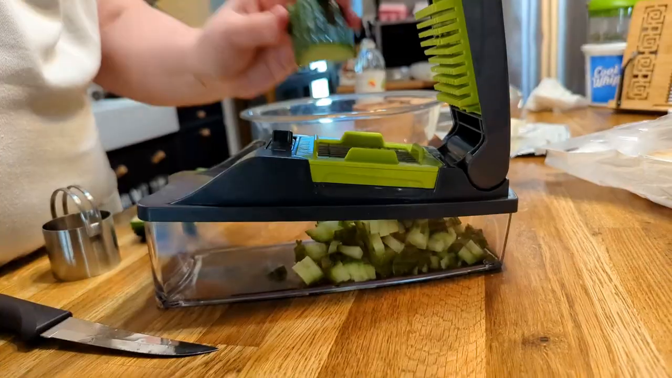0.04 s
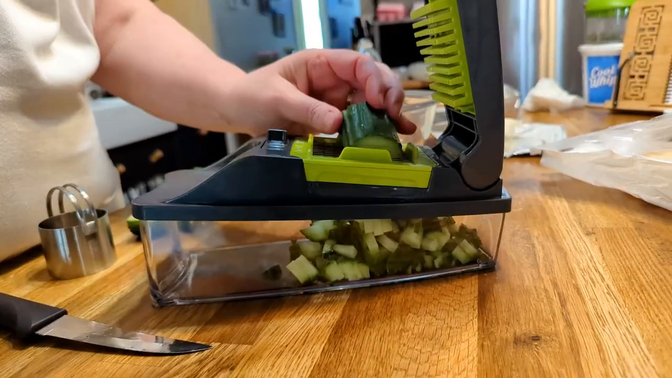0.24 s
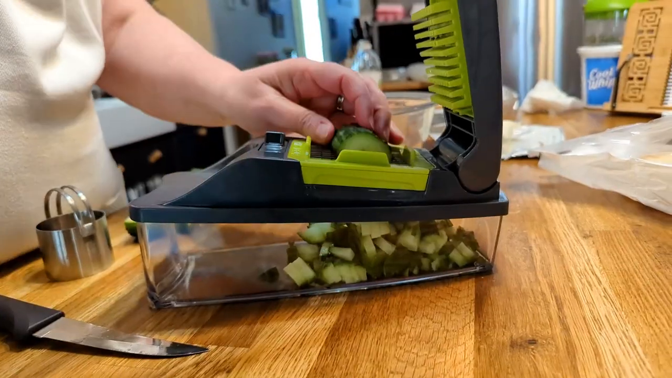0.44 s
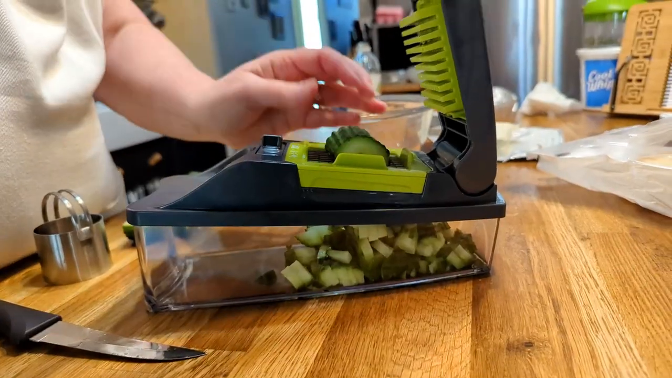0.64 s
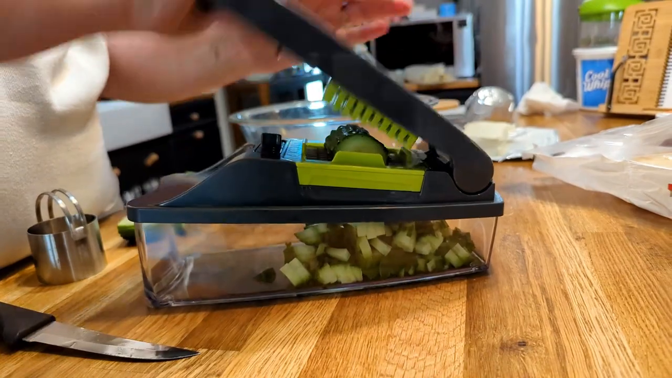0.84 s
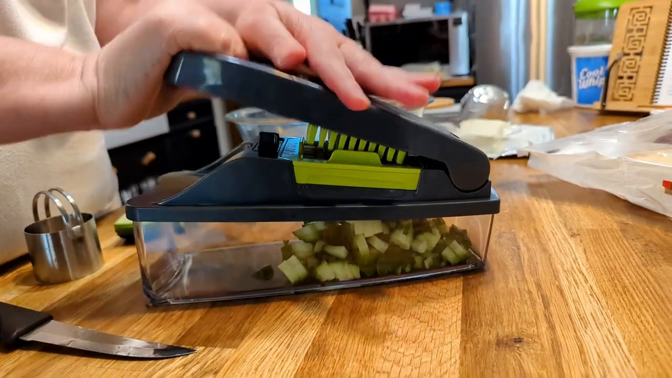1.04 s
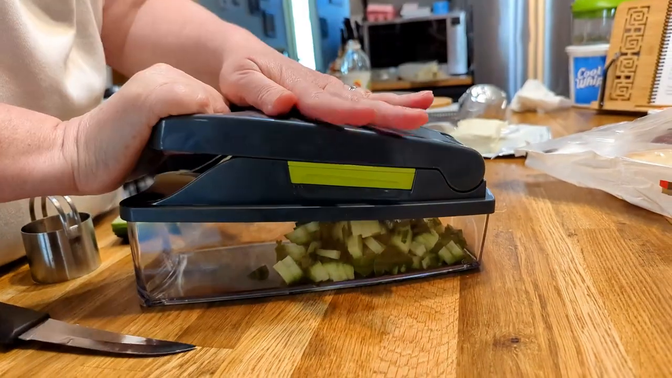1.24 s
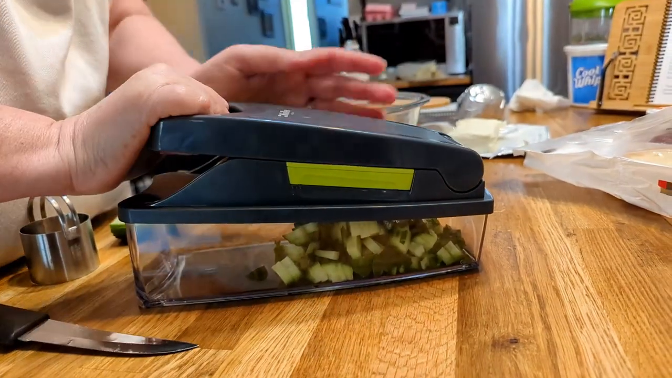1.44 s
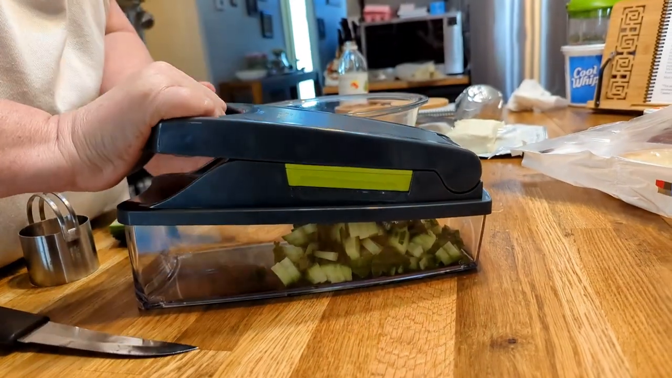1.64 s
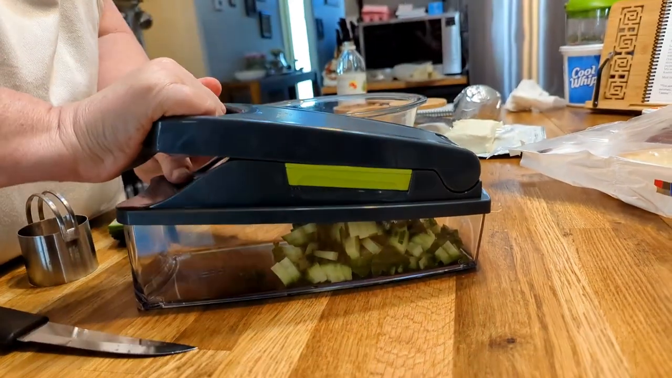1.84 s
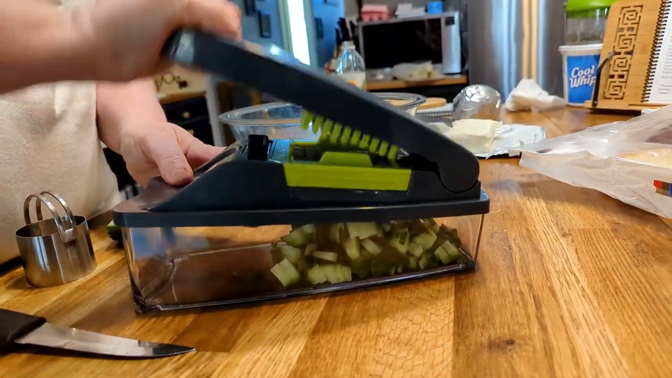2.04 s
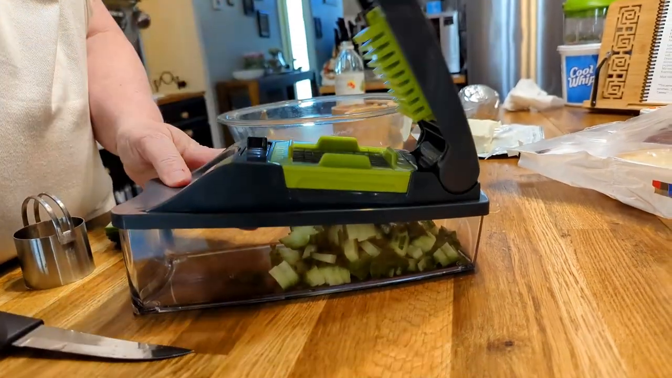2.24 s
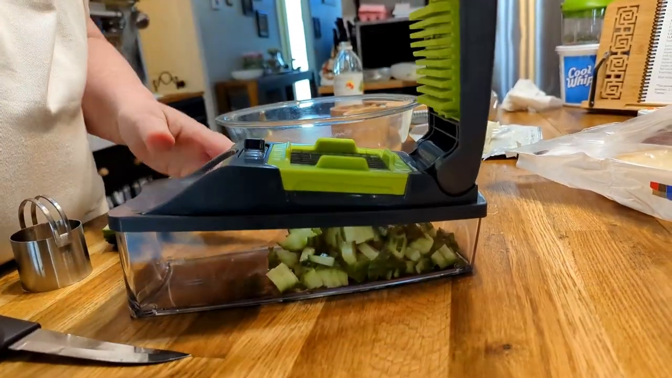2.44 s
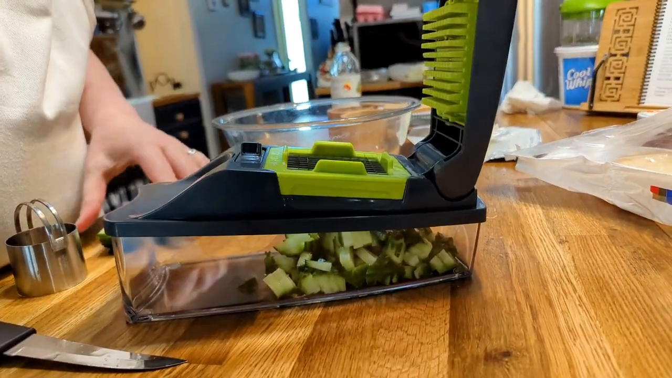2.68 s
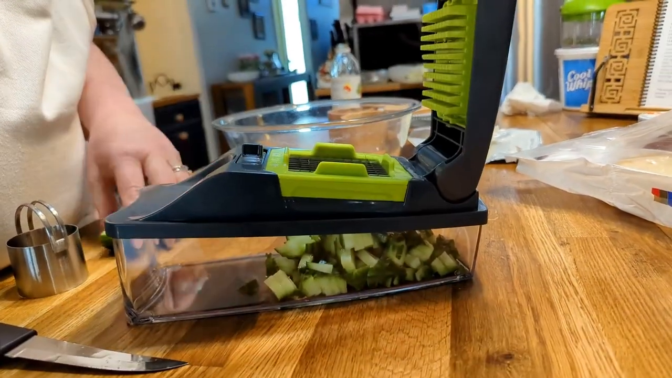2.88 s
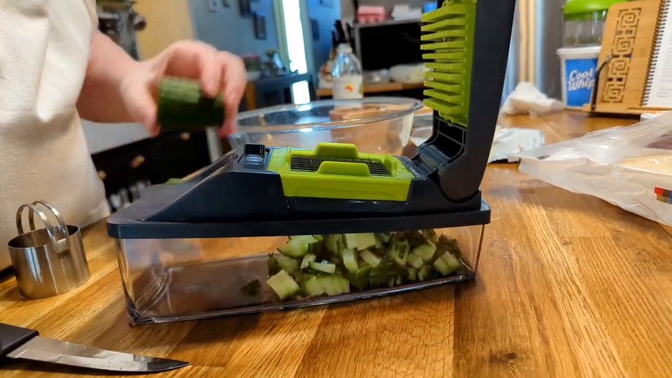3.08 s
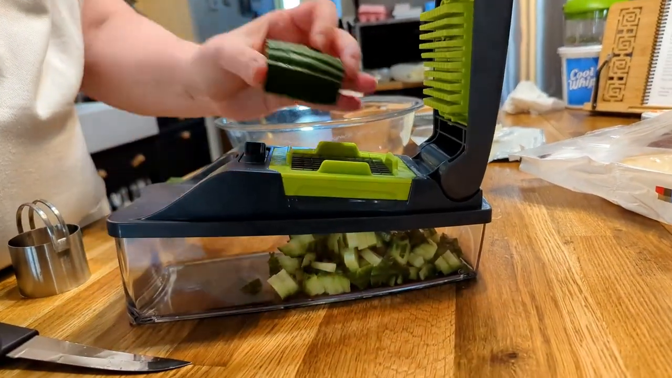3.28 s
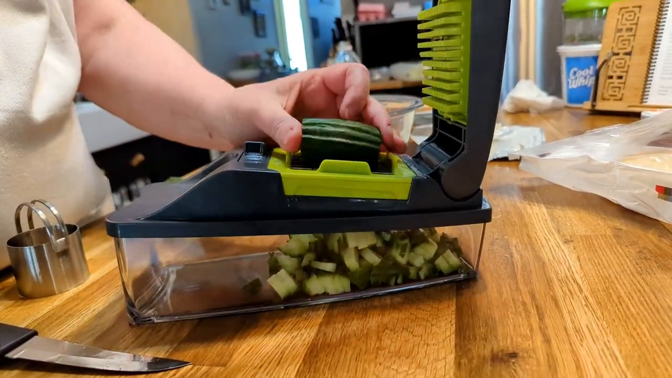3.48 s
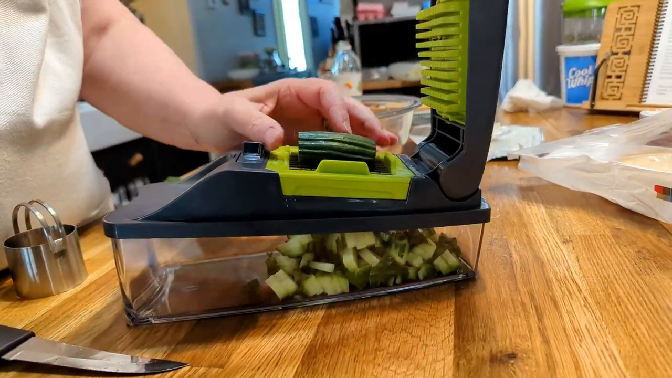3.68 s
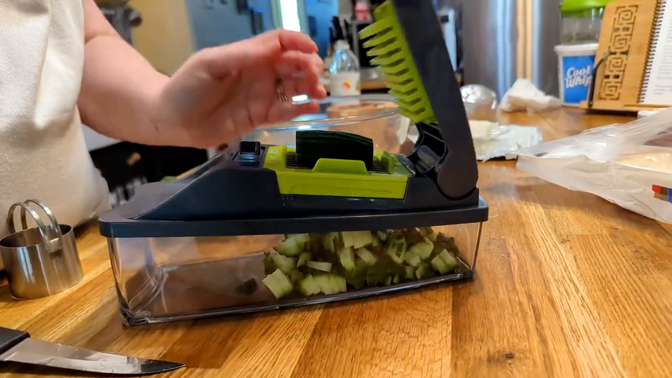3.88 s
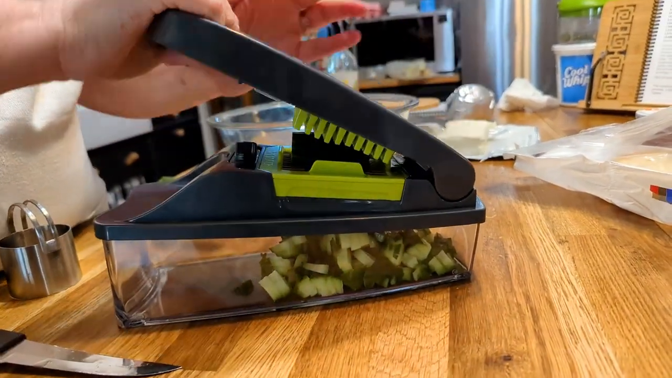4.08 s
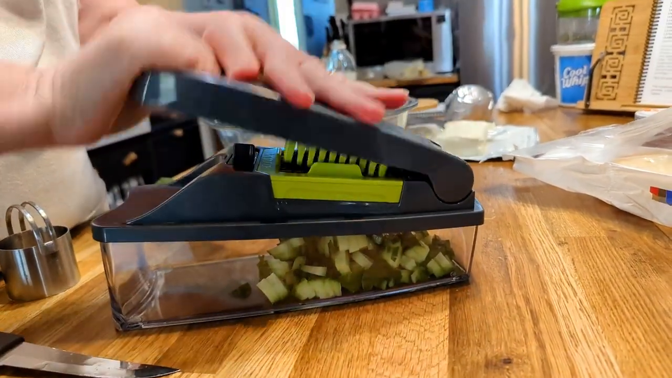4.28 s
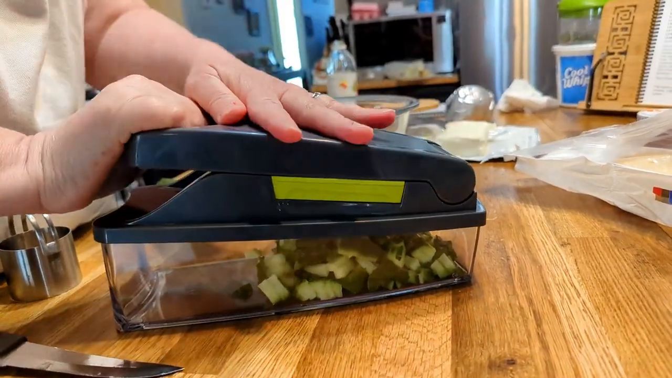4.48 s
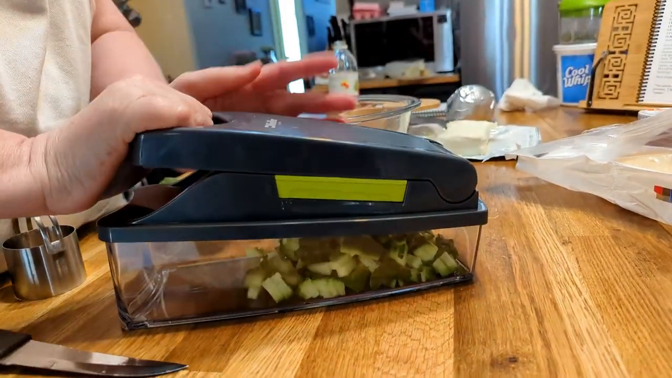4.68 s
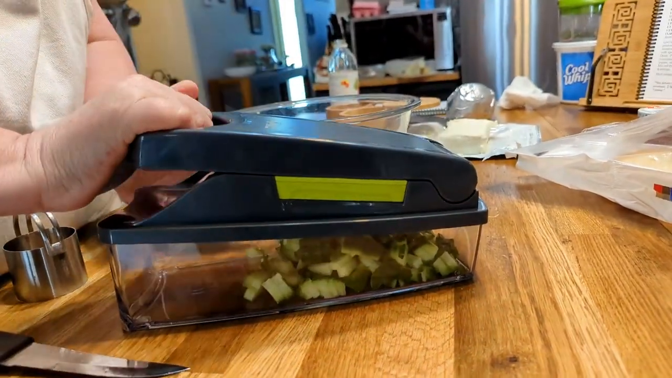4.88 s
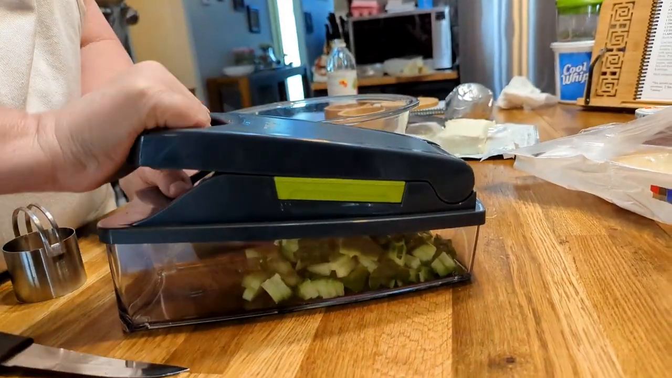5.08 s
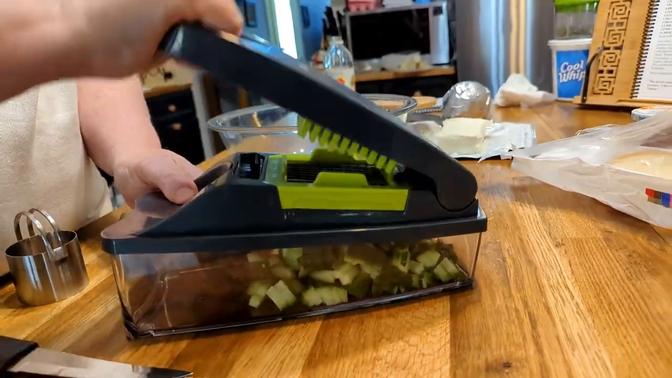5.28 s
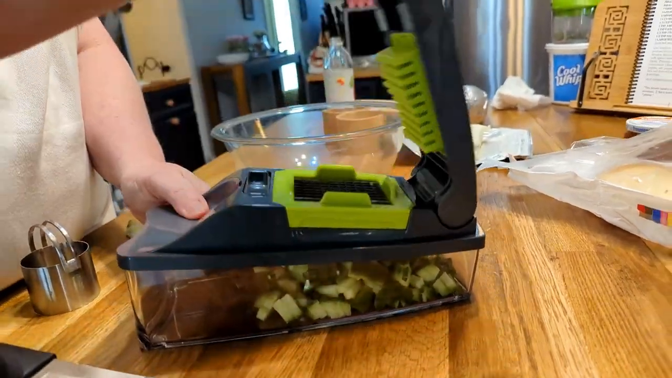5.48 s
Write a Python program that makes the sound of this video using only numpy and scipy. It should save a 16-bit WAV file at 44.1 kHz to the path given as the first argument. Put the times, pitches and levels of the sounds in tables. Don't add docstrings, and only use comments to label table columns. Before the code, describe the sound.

A quiet kitchen with a soft low room wash and faint appliance hum, heard close in stereo with short, bright reflections. At 0.2-0.3 s a vegetable piece is set down with small dull clicks, then faint finger touches. Around 0.93 s the plastic lid knocks sharply; at 1.15 s the piece cracks and fibres crunch in a quick burst, fading by 1.4 s, leaving a very faint low glassy tone. Soft touches lead to a hollow clack and rattle at 2.05 s as the lid pulls free, then hinge ticks and light rubbing to 2.7 s. Near quiet until a piece clicks down at 3.45 s. A glass bowl tings brightly at 3.85 s, damped soon after. Lid taps at 4.1-4.2 s; a creak rises from 4.3 s into the loudest event, a heavy crunching crack and woody thunk at 4.37-4.48 s. Faint handling, then release clatter at 5.25-5.3 s and a small last knock at 5.46 s.

```python
import sys
import numpy as np
from scipy import signal
from scipy.fft import rfft, irfft, next_fast_len
from scipy.io import wavfile
from scipy.ndimage import uniform_filter1d

SR = 44100
rng = np.random.default_rng(int(sys.argv[2]) if len(sys.argv) > 2 else 0)


def voltage_ratio(level):
    return 10 ** (np.asarray(level, float) / 20)


def output_pcm(signal):
    pcm = np.clip(np.atleast_2d(signal).T, -1, 1) * 32767
    wavfile.write(sys.argv[1], SR, np.round(pcm).astype(np.int16))


N = 243431

# (frequency [Hz], level [dB per Hz])
AIR = [(25, -40.5), (45, -5), (70, -4), (125, 0.5), (400, -8), (1100, -19.5), (4500, -34.5), (16000, -43.5)]
AIR_DB = -59.5
# (frequency [Hz], width [Hz], level [dB])
HUM = [(117.8, 12, -65.5), (301.7, 6.9, -71), (440, 8, -75), (725.4, 14, -73)]
# (frequency [Hz], t60 [s])
KITCHEN = [(60, 0.13), (250, 0.51), (1000, 0.51), (3000, 0.62), (7000, 0.56), (14000, 0.2)]
KITCHEN_DB = -11.5
# (frequency [Hz], side gain [dB])
PORT_WIDTH = [(60, -22), (200, -18), (400, -7.5), (800, -3.5), (2000, 1.5), (8000, 0), (16000, 1)]
# (time [s], left minus right [dB])
PLACE = [(0.0, -4.5), (0.11, 0.5), (0.37, -1.5), (1.43, -1), (2.01, -1.5), (3.21, -1), (3.24, -1.5),
         (3.64, -1), (3.709, -1.5), (3.89, 2.5), (4.09, 0), (4.23, 0), (4.58, -1), (5.13, -1), (5.52, -1)]
# (frequency [Hz], gain [dB])
MICROPHONE = [(15, -32.5), (30, -29), (45, -12.5), (70, -4.5), (160, -3), (14500, -1), (15800, -11),
              (16600, -30.5)]
# (time [s], depth [dB], half length [ms])
CLAMPS = [
    (1.151, -12.5, 2.8),
    (4.378, -10, 3.2),
]

# (frequency [Hz], level [dB], t60 [s])
COUNTER = [(52.3, -10.5, 0.15), (68.7, -1, 0.5), (84.5, -12, 0.057), (103, 0.5, 0.078), (160.8, 5, 0.66),
           (185, -10, 0.11)]
# (time [s], level [dB], rise [dB/s], fall [dB/s])
THUDS = [(.938, -41, 654, 70), (1.03, -41.5, 148, 152), (1.19, -41.5, 123, 67), (1.346, -44, 167.5, 163),
         (1.86, -47, 158, 432), (2.073, -30, 594, 116), (2.31, -64, 600, 280), (3.51, -49, 151, 398),
         (3.642, -49, 400, 123), (3.94, -47, 202.5, 108), (4.214, -43.5, 110, 280),
         (4.292, -37.5, 699.5, 113.5), (4.41, -21.5, 649, 124.5), (5.07, -53, 300, 100),
         (5.289, -24, 477, 163.5), (5.5, -53, 149, 100)]

# (frequency [Hz], level [dB], t60 [s])
GLASS = [(1394, 1.5, 0.81), (2570, 0, 0.3), (2640, 6, 0.025), (4020, -10.5, 0.3), (5660, -3.5, 0.35),
         (6300, -19, 0.35), (7100, -8.5, 0.22), (7240, -8, 0.12), (7300, -4, 0.2), (8613, -15, 0.12),
         (8780, -13.5, 0.16), (9000, -18.5, 0.17), (10150, -16.5, 0.12), (11790, -14, 0.22)]
# (frequency [Hz], level [dB], t60 [s])
GLASS_LOW = (527, -48, 3.6)
GLASS_S, GLASS_DB, GLASS_RISE_S = 3.8465, -16.5, 0.00093
GLASS_LOW_S = 1.2
DAMPED_S, DAMPED_DB, CHOKE_S, CHOKE_DB_PER_S = 3.98, -4, .1, 35
SPLIT_SHARE, TWIN_DB, TWIN_T60_SHARE = 0.0043, -5.5, 0.3
SHIMMER_LOW_HZ, SHIMMER_TOP_HZ, SHIMMER_DB = 6000, 15700, -28
SHIMMER_T60, SHIMMER_SHORTEN = 0.36, 1.2
SPLASH_LOW_HZ, SPLASH_TOP_HZ, SPLASH_DB, SPLASH_T60 = 2000, 15000, -30, .2

# (time [s], length [s], level [dB], fizz against it [dB])
RUBS = [(0.69, .014, -82, 2), (0.32, .12, -75, 4), (2.249, 0.18, -67.5, -3.5), (2.441, .16, -58.5, -5),
        (2.655, 0.047, -68, -8), (4.76, 0.087, -90, 16), (4.921, 0.0219, -67, -10), (4.947, 0.12, -90, 19),
        (5.423, 0.11, -62, -5), (4.25, .05, -64.5, 10.5), (4.5, 0.053, -55.5, -22), (2.4, 0.14, -86.5, 5)]
# (frequency [Hz], level [dB per Hz])
RUSTLE = [(700, -23.5), (1300, -5), (2600, -5.5), (3900, -3.5), (5000, -16.5), (7000, -13), (9000, -59.5)]
RUB_EDGE_SHARE, RUB_SWELL_DB = 0.54, 9.5

# (frequency [Hz], level [dB], t60 [s])
BOX = [(224.7, -9, 0.21), (274, -7, 0.13), (298, 1, 0.2), (367, -1, 0.061), (376.3, -4, 0.11),
       (450, -1, 0.044), (528.7, -6.5, 0.16), (540, 0, 0.075), (606.6, -5.5, 0.09), (673, -8, 0.3),
       (746, -3, 0.07), (918, -14, 0.1)]
# (frequency [Hz], level [dB])
LID = [(300, -26), (600, -3), (1000, 0), (1500, 1), (2000, -5.5), (3000, -17), (4500, -21.5), (7000, -61)]
# (frequency [Hz], level [dB per Hz])
CRACK = [(1500, -23), (2500, -0.5), (4000, -4), (6000, -8), (8200, -17), (10500, -8), (15500, -13.5),
         (16600, -27.5)]
# (frequency [Hz], gain [dB])
SOFT = [(2500, -6.5), (5000, -9.5), (9000, -7.5), (16000, -16)]
# (frequency [Hz], gain [dB])
PADDED = [(300, 0), (1900, -2), (3500, -6.5), (6000, -13.5)]
SNAPS_PER_S, SNAP_SPREAD_DB, CLUMP_DB = 2500, 3.5, 2
LID_T60, TONE_T60, SOFT_TONE_T60 = 0.028, 0.025, .014
CONTACT_RISE_S, SOFT_RISE_S = 0.0019, 0.0032
HARD_TONE_DB, SOFT_TONE_DB, CUT_TONE_DB, RATTLE_TONE_DB = 1, -3, 1.5, -3.5

# (time [s], level [dB], quick drop [dB], boom [dB], fizz [dB])
RATTLES = [
    (0.94, -46, -10, -2, -6),
    (1.005, -47, -10.5, 13.5, -9),
    (2.05, -22.5, -15, -8, -9),
    (2.074, -25.5, -22, -1, -21),
]
# (time [s], level [dB], quick drop [dB], boom [dB], fizz [dB])
LATE_RATTLES = [
    (3.43, -39, -12, 0.5, -13.5),
    (3.46, -25.5, -31.5, -13.5, -14),
    (4.098, -29, -17.5, -11, -9.5),
    (4.186, -39.5, -21.5, -2.5, -22.5),
    (5.25, -30.5, -6.5, -4, -5),
    (5.272, -29.5, -9, -10.5, -28),
    (5.305, -36, 4, 5.5, -15),
    (5.425, -42.5, 1.5, -28, -34),
]
RATTLE_TONES_HZ, LATE_TONES_HZ = (380, 760, 1990), (330, 620, 950)
RATTLE_S, RATTLE_RISE_S, RATTLE_DROP_S = 0.16, 0.0058, 0.022
RATTLE_FALL_DB_PER_S, BOOM_FALL_DB_PER_S, SHINE_FALL_DB_PER_S = 87.5, 144, 68.5

# (time [s], peak [dB], pitch [Hz])
POPS = [(.169, -36, 1500), (.278, -22, 1200), (.931, -20, 1000), (.937, -15.5, 800), (1.003, -27, 1000),
        (1.155, -19, 896), (1.159, -20, 1200), (1.178, -19, 600), (1.186, -20, 600), (1.204, -19, 600),
        (1.213, -20, 600), (1.227, -17, 650), (2.046, -15, 496), (2.05, -18, 700), (2.066, -18, 500),
        (2.102, -23, 450), (2.147, -25, 700), (2.918, -50.5, 560), (3.4655, -15, 1010),
        (3.469, -21.5, 1310), (3.4725, -17.5, 890), (4.0955, -14.5, 1060), (4.106, -27, 1400),
        (4.119, -29, 1100), (4.19, -18.5, 950), (4.194, -27.5, 600), (4.299, -14.5, 390), (4.309, -19, 400),
        (4.371, -9, 1000), (4.382, -7, 1300), (4.386, -6, 703), (4.396, -10, 700), (4.416, -6.5, 610),
        (4.4345, -5, 542), (4.439, -3.5, 580), (4.453, -10, 580), (4.459, -12, 560), (4.477, -14.5, 550),
        (5.25, -17.5, 1100), (5.2745, -13, 846), (5.278, -15, 605), (5.282, -14, 330), (5.327, -20, 330),
        (5.466, -31, 900), (3.453, -24, 1200), (.212, -33, 1300), (2.293, -36, 1050), (2.305, -36, 1400)]
POP_CYCLES, POP_SAG, POP_EDGE_DB = 1.2, .15, -9

# (time [s], knock peak [dB], knock pitch [Hz], boom [dB], crack [dB]), the last two re knock
TOUCHES = [(0.167, -35, 1300, -12.5, -35), (0.375, -46, 1360, 4, -16), (0.62, -41.5, 890, 0.5, -45),
           (0.671, -44.5, 1020, 1, -25), (0.698, -33.5, 1430, -45, -25.5), (0.797, -46.5, 1216, -9, -35),
           (0.878, -36.5, 1040, -34, -38), (0.891, -34.5, 1310, -22, -18.5), (0.901, -39, 1420, -19, -30),
           (1.638, -48, 840, -27, -31.5), (1.724, -51.5, 1230, -2, -10.5), (1.808, -42, 925, 0, -42),
           (1.846, -41, 824, 5.5, -20.5), (1.891, -47, 980, 1, -21), (3.612, -37, 918, -1, -17),
           (3.63, -35.5, 1290, -3.5, -20.5), (3.621, -35, 990, -4.5, -33), (3.705, -52.5, 1200, -12, -35),
           (3.777, -48, 1340, -14, -42), (3.974, -25.5, 1252, -22, -27.5), (4.056, -35, 1366, -30.5, -33),
           (5.031, -56.5, 1030, 6.5, -20), (4.929, -47, 1060, 0, -13), (5.097, -50.5, 1177, 0, -31),
           (5.136, -44, 1284, -6, -34), (5.149, -44, 1210, -20, -40)]
TUMBLES = [(2.102, -34, 500, -8, -25), (2.124, -42, 450, 2, -25), (2.147, -32, 560, -6, -27),
           (2.255, -38, 810, -6, -30), (2.238, -34, 1460, -28, -14.5), (2.293, -35, 1080, -20, -30),
           (2.303, -34.5, 1360, -14, -34), (2.369, -41.5, 1380, -4, -22), (2.441, -48, 1430, -1, -13),
           (2.53, -43.5, 1040, -27, -24), (2.813, -51.5, 1056, -16, -30), (5.42, -32, 1910, -24, -42)]
SET_DOWNS = [(0.21, -29, 1020, -32, -19), (0.218, -35, 696, 4, -24), (0.275, -27.5, 560, -20, -32),
             (3.427, -27, 1136, -16, -30), (3.451, -21, 1220, -15, -20.5), (3.464, -18, 810, -11, -20.5),
             (3.847, -42, 570, -3, 5)]
LATE_TAPS = [(3.98, -27, 1500, -25, -27), (3.995, -37, 1300, -20, -22), (4.04, -39, 1200, -25, -28),
             (4.104, -23.5, 1500, -20, -13), (4.116, -28, 1150, -15, -20), (4.142, -34, 1400, -15, -25),
             (2.298, -34, 1200, -25, -29), (5.32, -29.5, 1700, -13, -25)]
LID_TAPS = [(4.093, -16, 1050, -29.5, -18), (4.189, -32, 900, -11.5, -45)]
LID_KNOCKS = [(0.917, -24.5, 1000, -9, -22), (0.927, -13.5, 980, -7, -8), (0.935, -18.5, 1000, -4, -20.5),
              (1.001, -25.5, 974, -3.5, -17), (2.035, -23, 620, 0, -20), (2.044, -12.5, 1210, 1, -11),
              (2.047, -16, 417, -8, -25), (2.064, -22, 1520, -9, -15), (2.075, -26.5, 1980, -2.5, -21.5)]
LID_RELEASES = [(5.24, -27.5, 630, 4.5, -15), (5.248, -15, 1072, -7.5, -20.5), (5.273, -14.5, 724, -1, -26),
                (5.464, -27.5, 1075, -6.5, -26)]
BREAKS = [(1.144, -22.5, 670, -24, -7.5), (1.152, -14.5, 640, -13, -7.5), (4.297, -16.5, 396, 2, -32),
          (4.322, -20.5, 1050, -13.5, -8), (4.353, -15, 1020, -9.5, -15.5), (4.367, -9, 1080, -17, -15),
          (4.38, -4.5, 590, -20, -10.5), (4.415, -9.5, 560, -6.5, -19), (4.435, -8, 590, -7, -22)]
FIBRES = [(1.168, -20, 690, -11, -12), (1.185, -21, 760, -9, -16), (1.202, -20, 626, -5, -23),
          (1.212, -21, 725, -10.5, -20), (1.226, -17, 655, -18, -16), (1.242, -22.5, 700, -12, -11),
          (1.307, -29, 614, -0.5, -20), (1.395, -30, 576, -6.5, -33), (4.403, -10.5, 1255, -13, -19),
          (4.445, -11, 620, -8.5, -17.5), (4.458, -15.5, 692, -11.5, -20), (4.475, -15.5, 555, -15, -23),
          (4.508, -20.5, 499, -10, -22), (4.538, -21.5, 600, -8, -24.5), (4.392, -11, 600, -6, -20),
          (4.425, -11, 540, -7.5, -21.5)]
TOUCH_CHATTER_MS, TUMBLE_CHATTER_MS, SET_DOWN_CHATTER_MS, TAP_CHATTER_MS = 5.13, 3.4, 7.7, 3
LID_CHATTER_MS, RELEASE_CHATTER_MS, BREAK_CHATTER_MS, FIBRE_CHATTER_MS = 5.32, 4.9, 10.1, 4

# (start [s], end [s], level [dB], pitch from [Hz], pitch to [Hz])
CREAKS = [
    (1.095, 1.161, -33.5, 1290, 810),
    (4.29, 4.317, -23.5, 393, 397),
    (4.311, 4.377, -22, 958, 1053),
    (4.333, 4.37, -29, 420, 400),
]
CREAK_WIDTH_HZ, CREAK_SWELL_DB = 260, 12
# (time [s], force [dB])
CUTS = [
    [(1.06, -49), (1.126, -41), (1.15, -32.5), (1.16, -34), (1.175, -26), (1.206, -24), (1.29, -36),
     (1.42, -41), (1.62, -63.5)],
    [(4.27, -42), (4.292, -36), (4.302, -36.5), (4.318, -30.5), (4.39, -20.5), (4.44, -20.5), (4.492, -27),
     (4.7, -53)],
]
# (boom at start [dB], boom at end [dB], fizz at start [dB], fizz at end [dB])
CUT_COLOURS = [
    (-3, -2, -9, -9.5),
    (-1, -6, -8.5, -13),
]
CUT_TONES_HZ = (580, 670, 750)
FIZZ_FADE_SHARE = 0.75


def evened(x):
    return x / np.sqrt(np.mean(x ** 2) + 1e-20)


def peaked(x):
    return x / (abs(x).max() + 1e-20)


def read(points, hz):
    f, value = np.transpose(points)
    return np.interp(np.log(hz + 1), np.log(f + 1), value)


def add(mix, s, sound):
    part = mix[..., max(round(s * SR), 0):][..., :sound.shape[-1]]
    part += sound[..., :part.shape[-1]]


def colour(x, points):
    size = next_fast_len(x.shape[-1] + 1024)
    gain = voltage_ratio(read(points, np.fft.rfftfreq(size, 1 / SR)))
    return irfft(rfft(x, size) * gain, size)[..., :x.shape[-1]]


def flattened(x):
    z = rfft(x, len(x) + 1024)
    smooth = np.sqrt(uniform_filter1d(abs(z) ** 2, 30) + 1e-12)
    return irfft(z / smooth)[:len(x)]


def slow_noise(size, window):
    noise = uniform_filter1d(rng.standard_normal(size), window)
    return evened(uniform_filter1d(noise, window))


def ring(modes, size):
    hz, db, t60 = np.transpose(modes)[..., None]
    t = np.arange(size) / SR
    return voltage_ratio(db - 60 * t / t60) * np.sin(2 * np.pi * hz * t)


def snaps(size):
    chance, sign, height = rng.random((size, 3)).T
    spread = np.minimum(-np.log(height + 1e-9), 3)
    return (chance < SNAPS_PER_S / SR) * np.sign(sign - .5) * voltage_ratio(SNAP_SPREAD_DB * spread)


def air():
    size = next_fast_len(N)
    swell = slow_noise(size, 9000)
    wash = voltage_ratio(AIR_DB + swell) * evened(colour(rng.standard_normal((2, size)), AIR))
    f, z = np.fft.rfftfreq(size, 1 / SR), rfft(rng.standard_normal(size))
    for hz, width, db in HUM:
        resonance = 1 + ((f - hz) * 2 / width) ** 2
        wash = wash + voltage_ratio(db) * evened(irfft(z / resonance, size))
    return wash[:, :N]


def kitchen(x):
    taps = np.zeros((6, 30000))
    at = np.arange(200, 29980, 20) + rng.integers(0, 20, (6, 1489))
    np.put_along_axis(taps, at, rng.choice([-1., 1.], at.shape), 1)
    hz, t, z = signal.stft(taps, SR, nperseg=256)
    decay = voltage_ratio(-60 * t / read(KITCHEN, hz)[:, None])
    tail = signal.istft(z * decay, SR, nperseg=256)[1]
    z = rfft(tail, 32768)
    power = abs(z) ** 2
    bumps = uniform_filter1d(power, 80) / uniform_filter1d(power, 700)
    tail = irfft(z / np.sqrt(bumps + 1e-3))[:, :30000]
    tail *= voltage_ratio(KITCHEN_DB) / np.linalg.norm(tail, axis=1, keepdims=True)
    glance = rng.standard_normal((3, 300)) * np.exp(-np.arange(300) / 82.0)
    tail[3:, :300] += voltage_ratio(-1.0) * glance / np.linalg.norm(glance, axis=1, keepdims=True)
    turn = 2 * np.pi * (np.arange(N) / SR * 21.0 + np.arange(3)[:, None] / 3)
    shares = x * np.cos(turn) * np.sqrt(2 / 3)
    wet = signal.oaconvolve(np.tile(shares, (2, 1)), tail, axes=1)[:, :N]
    return wet.reshape(2, 3, N).sum(1) + x * np.array([[1], [0]])


def counter():
    s, db, rise, fall = np.transpose(THUDS)[..., None]
    since = np.arange(0, N + 64, 64) / SR - s
    thuds = voltage_ratio(db + np.minimum(rise * since, -fall * since))
    weight = np.sqrt((thuds ** 2).sum(0))
    shake = signal.fftconvolve(snaps(N + 8000), ring(COUNTER, size=8000).sum(0), "valid")[:N]
    shake = shake / np.sqrt(uniform_filter1d(shake ** 2, 3000) + 1e-9)
    return np.interp(np.arange(N) / 64, np.arange(len(weight)), weight) * shake


def bowl_modes(count=45):
    twins = np.array(GLASS[1:]) * [1 - SPLIT_SHARE, 1, TWIN_T60_SHARE] + [0, TWIN_DB, 0]
    a, b, c = rng.random((count, 3)).T
    hz = SHIMMER_LOW_HZ * (SHIMMER_TOP_HZ / SHIMMER_LOW_HZ) ** a
    t60 = SHIMMER_T60 * (0.55 + c) / (1 + SHIMMER_SHORTEN * a)
    crowd = np.transpose([hz, SHIMMER_DB + 3.5 - 17 * b, t60])
    return np.vstack([GLASS, twins, crowd])


def bowl():
    out = np.zeros(N)
    t = np.arange(SR // 3) / SR
    since_touch = t + GLASS_S - DAMPED_S
    modes = bowl_modes()
    grip = np.clip(3500 / modes[:, :1], 0, 1) ** 3
    choke_db = grip * DAMPED_DB * np.clip(since_touch / CHOKE_S, 0, 1)
    choke_db = choke_db - CHOKE_DB_PER_S * np.maximum(since_touch, 0)
    strike = (ring(modes, size=len(t)) * voltage_ratio(choke_db)).sum(0)
    add(out, GLASS_S, voltage_ratio(GLASS_DB) * peaked(strike * np.minimum(t / GLASS_RISE_S, 1)))
    hz, db, t60 = GLASS_LOW
    t = np.arange(N) / SR
    since_press = t - GLASS_LOW_S
    swell = np.clip(since_press / 0.11, 0, 1) * voltage_ratio(db - 60 * np.maximum(since_press, 0) / t60)
    return out + swell * np.sin(2 * np.pi * hz * t)


def splash(count=160):
    a, b, c = rng.random((count, 3)).T
    hz = SPLASH_LOW_HZ + (SPLASH_TOP_HZ - SPLASH_LOW_HZ) * a
    modes = np.transpose([hz, -14 * b - 12 * a, SPLASH_T60 * (.4 + c)])
    sound = (ring(modes, size=SR // 4) * np.sign(c - .5)[:, None]).sum(0)
    return GLASS_S + 0.00056, voltage_ratio(SPLASH_DB) * peaked(sound)


def rub(s, length, db, fizz_db):
    t = np.arange(0, length, 1 / SR)
    flicker = uniform_filter1d(abs(snaps(len(t))), 80)
    grit = rng.standard_normal(len(t)) * (1 + .3 * flicker)
    fizz = colour(grit, [(5000, -32.5), (7000, -10.0), (14000, -2.5), (16500, -1.0)])
    sound = evened(colour(grit, RUSTLE)) + voltage_ratio(fizz_db) * evened(fizz)
    swell = voltage_ratio(db + RUB_SWELL_DB * (t / length - .5))
    return s, swell * sound * signal.windows.tukey(len(t), RUB_EDGE_SHARE)


def pop(s, db, hz):
    turns = np.arange(1024) / SR * hz
    phase = 2 * np.pi * np.log1p(POP_SAG * turns) / POP_SAG
    swing = np.sin(phase) + voltage_ratio(POP_EDGE_DB) * np.sin(2.7 * phase) * np.exp(-turns)
    return s - 0.26 / hz, voltage_ratio(db) * peaked(swing * np.exp(-turns / POP_CYCLES))


def struck(drive, knock_hz, tone_db, box, tone_t60=TONE_T60):
    t = np.arange(2048) / SR
    dense = signal.fftconvolve(drive, rng.standard_normal(2048) * voltage_ratio(-60 * t / LID_T60))
    local = ring([(knock_hz, 0, tone_t60)], size=2048)[0]
    tone = signal.fftconvolve(flattened(drive), local)
    place = voltage_ratio(4.54 * rng.standard_normal(len(box))) * rng.choice([-1, 1], len(box))
    boom = signal.fftconvolve(flattened(drive), place @ box)
    knock, crack = np.zeros(len(boom)), np.zeros(len(boom))
    add(knock, 0, evened(colour(flattened(dense), LID)) + voltage_ratio(tone_db) * evened(tone))
    grit = drive + 2.25 * uniform_filter1d(abs(drive), 40) * rng.standard_normal(len(drive))
    add(crack, 0, colour(flattened(grit), CRACK))
    return knock, boom, crack


def blow(box, soft, s, db, hz, boom_db, crack_db, chatter_ms):
    tone_db, tone_t60, rise_s = HARD_TONE_DB, TONE_T60, CONTACT_RISE_S
    if soft:
        tone_db, tone_t60, rise_s = SOFT_TONE_DB, SOFT_TONE_T60, SOFT_RISE_S
    t = np.arange(4096) / SR
    drive = snaps(len(t)) + .5 * rng.standard_normal(len(t))
    drive[60] += abs(drive[:300]).max()
    drive *= np.exp(-(t * 1000 / chatter_ms) ** 2.3) * np.minimum(t / rise_s, 1)
    knock, boom, crack = struck(drive, hz, tone_db, box, tone_t60)
    if soft:
        knock, crack = colour(knock, PADDED), colour(crack, SOFT)
    sound = peaked(knock) + voltage_ratio(boom_db) * peaked(boom) + voltage_ratio(crack_db + 6.5) * peaked(crack)
    return s, voltage_ratio(db) * sound


def crunch(box, tones_hz, tone_db, force_db, boom_db, fizz_db, shine_db):
    size = len(force_db)
    parts = sum(np.array(struck(snaps(size), hz, tone_db, box)) for hz in tones_hz)
    knock, boom, fizz = (evened(v[:size]) for v in parts)
    dull = colour(fizz, [(5500, 1.5), (9000, -28.0)])
    fizz = dull + voltage_ratio(shine_db) * (fizz - dull)
    clumps = slow_noise(size, 300)
    sound = knock + voltage_ratio(boom_db) * boom + voltage_ratio(fizz_db) * fizz
    return voltage_ratio(force_db + CLUMP_DB * clumps) * sound


def rattle(box, tones_hz, s, db, drop_db, boom_db, fizz_db):
    t = np.arange(round(RATTLE_S * SR)) / SR
    fall_db = drop_db * np.minimum(t / RATTLE_DROP_S, 1) ** 2 - RATTLE_FALL_DB_PER_S * t
    boom_db = boom_db - BOOM_FALL_DB_PER_S * t - fall_db
    shine_db = -SHINE_FALL_DB_PER_S * t
    sound = crunch(box, tones_hz, RATTLE_TONE_DB, db + fall_db, boom_db, fizz_db, shine_db)
    return s, sound * np.minimum(t / RATTLE_RISE_S, 1) * np.sqrt(1 - t / t[-1])


def creak(s, end, db, from_hz, to_hz):
    t = np.arange(0, end - s, 1 / SR)
    turn = np.exp(2j * np.pi * np.cumsum(np.linspace(from_hz, to_hz, len(t))) / SR)
    pole = np.exp(-np.pi * CREAK_WIDTH_HZ / SR)
    sound = (turn * signal.lfilter([1], np.poly([pole, pole]), snaps(len(t)) / turn)).real
    load = voltage_ratio(db + CREAK_SWELL_DB * (t / t[-1] - 1))
    return s, load * evened(sound) * signal.windows.tukey(len(t), .25)


def cut(box, rows, boom_from_db, boom_to_db, fizz_from_db, fizz_to_db):
    s, db = np.transpose(rows)
    t = np.arange(s[0], s[-1], 1 / SR)
    force_db = np.interp(t, s, db)
    after_db = (db - db.max()) * (s > s[db.argmax()])
    shine_db = FIZZ_FADE_SHARE * np.interp(t, s, after_db)
    boom_db = np.linspace(boom_from_db, boom_to_db, len(t))
    fizz_db = np.linspace(fizz_from_db, fizz_to_db, len(t))
    sound = crunch(box, CUT_TONES_HZ, CUT_TONE_DB, force_db, boom_db, fizz_db, shine_db)
    return s[0], sound * signal.windows.tukey(len(t), .15)


def scene():
    near, box, glass, room = counter(), ring(BOX, size=SR // 5), bowl(), air()
    add(near, *splash())
    for row in RUBS:
        add(near, *rub(*row))
    for row in POPS:
        add(near, *pop(*row))
    for rows, soft, chatter_ms in [
            (TOUCHES, True, TOUCH_CHATTER_MS), (TUMBLES, True, TUMBLE_CHATTER_MS),
            (SET_DOWNS, False, SET_DOWN_CHATTER_MS), (LATE_TAPS, False, TAP_CHATTER_MS),
            (LID_TAPS, False, TAP_CHATTER_MS), (LID_KNOCKS, False, LID_CHATTER_MS),
            (LID_RELEASES, False, RELEASE_CHATTER_MS), (BREAKS, False, BREAK_CHATTER_MS),
            (FIBRES, False, FIBRE_CHATTER_MS)]:
        for row in rows:
            add(near, *blow(box, soft, *row, chatter_ms))
    for rows, tones_hz in [(RATTLES, RATTLE_TONES_HZ), (LATE_RATTLES, LATE_TONES_HZ)]:
        for row in rows:
            add(near, *rattle(box, tones_hz, *row))
    for row in CREAKS:
        add(near, *creak(*row))
    for rows, tint in zip(CUTS, CUT_COLOURS):
        add(near, *cut(box, rows, *tint))
    mid, side = kitchen(near + 0.96 * glass) + room
    mid = mid + 0.081 * glass
    side = colour(side + .5 * np.roll(glass, 5), PORT_WIDTH)
    half_db = np.interp(np.arange(N) / SR, *np.transpose(PLACE)) / 2
    return np.array([(mid + side) * voltage_ratio(half_db), (mid - side) * voltage_ratio(-half_db)])


def roll_off(x):
    return signal.sosfilt(signal.butter(12, 16990, fs=SR, output="sos"), x)


def record(dry):
    s, db, ms = np.transpose(CLAMPS)[..., None]
    dips_db = db * np.exp(-((np.arange(N) / SR - s) * 1000 / ms) ** 2)
    clamp = voltage_ratio(dips_db.sum(0))
    return roll_off(colour(dry * clamp, MICROPHONE))


dry = scene()
out = record(dry)
output_pcm(out)
```